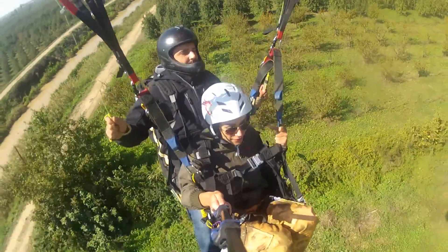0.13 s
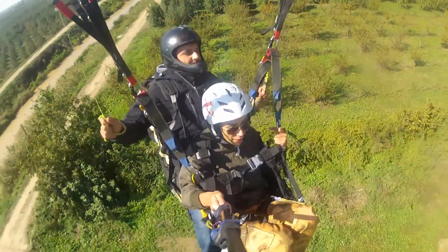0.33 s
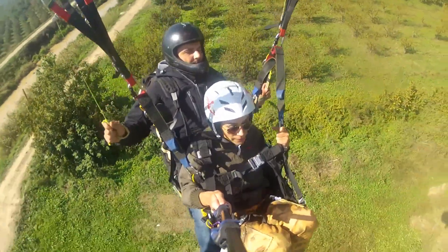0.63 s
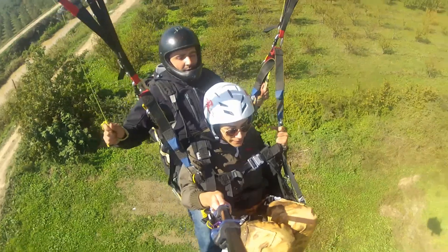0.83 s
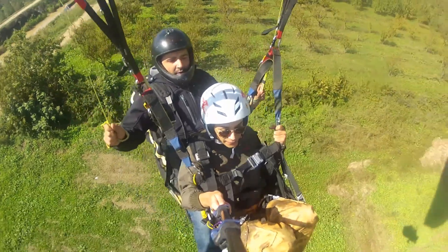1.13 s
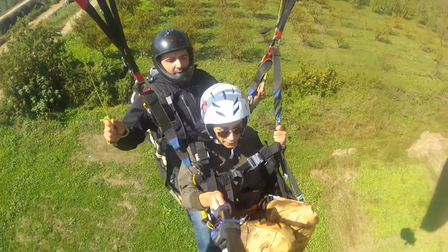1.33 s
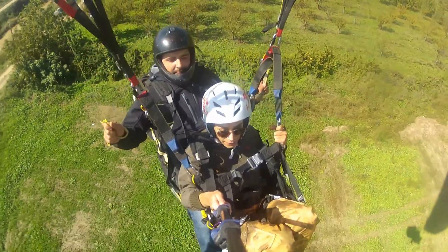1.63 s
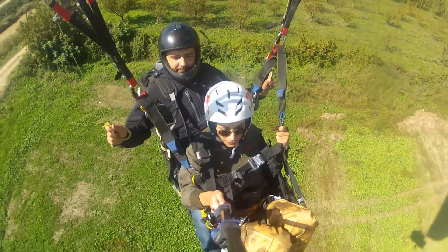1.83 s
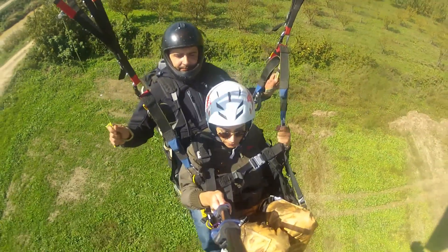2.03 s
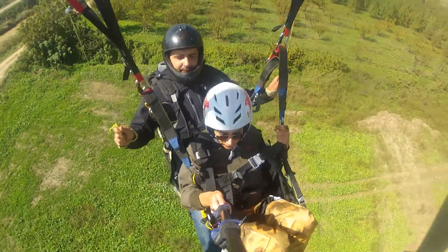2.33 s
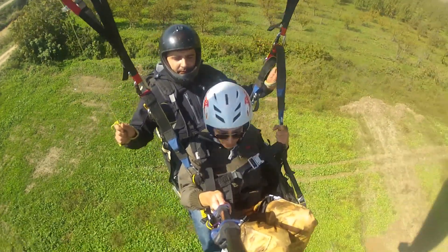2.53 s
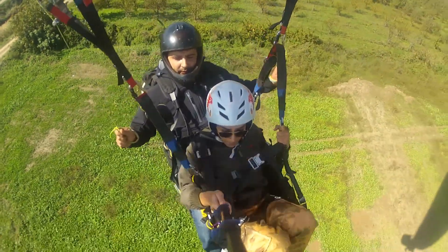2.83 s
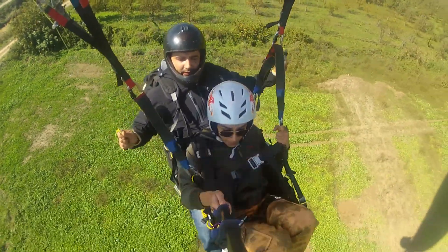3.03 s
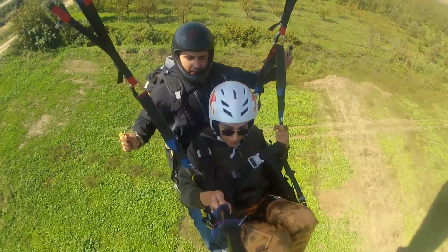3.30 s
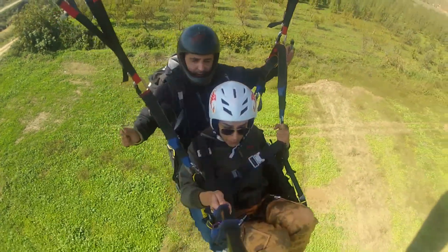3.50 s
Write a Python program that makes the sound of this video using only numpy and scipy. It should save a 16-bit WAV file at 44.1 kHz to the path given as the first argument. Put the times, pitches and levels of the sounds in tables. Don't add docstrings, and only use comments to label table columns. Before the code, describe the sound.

Low buffeting wind roar on a sealed camera case, with early hard thumps, gradually weakening

```python
import sys
import numpy as np
from scipy import signal
from scipy.fft import rfft, irfft, next_fast_len
from scipy.io import wavfile
from scipy.ndimage import uniform_filter1d, map_coordinates

SR = 44100
rng = np.random.default_rng(int(sys.argv[2]) if len(sys.argv) > 2 else 0)


def unload_audio(sound):
    columns = np.transpose(np.atleast_2d(sound))
    steps = np.round(np.clip(columns, -1, 1) * 32767)
    wavfile.write(sys.argv[1], SR, steps.astype(np.int16))


def gain_from_decibels(decibels):
    exponent = np.asarray(decibels, float) / 20
    return 10 ** exponent


N = 161406

# (time [s], strength [dB], heave of the large eddies [dB])
AIRFLOW = [(0.029, -31, 0), (.3, -29, -.5), (0.44, -29.5, -1), (0.77, -31.5, 0), (1.14, -33, 1.5),
           (1.35, -30.5, -1), (1.57, -30, -2), (1.721, -29.5, -1.5), (1.85, -34.5, 0), (2.13, -38, 1),
           (2.419, -40, -0.5), (2.69, -37, 0), (2.85, -38.5, 0.5), (3.06, -37, 0.5), (3.47, -41, -0.5),
           (3.63, -43.5, 0)]
# (frequency [Hz], density [dB per Hz])
DRUM_COLOUR = [(20, -24), (45, -6.5), (90, -4), (150, -0.5), (300, -3), (500, -6.5), (690, -12.5),
               (1000, -39)]
# (frequency [Hz], density [dB per Hz])
HISS_COLOUR = [(500, -23.5), (800, 2), (1100, -2.5), (1600, -9.5), (2100, -13.5), (2600, -21.5),
               (3100, -22), (6000, -63)]
# (frequency [Hz], width [Hz], level [dB])
CAVITIES = [(3588, 630, 5), (4443, 490, 3), (10380, 2400, -1.5)]
# (time [s], inward depth [full scale], width
# [ms])
SLAMS = [
    (0.0, -.3, .6),
    (0.1155, 1.08, .6),
    (0.3715, 1.06, .6),
    (0.6415, 1.34, .57),
    (0.8747, 1.23, .57),
    (3.66, .35, .6),
]

DRUM_DB, HISS_DB, CAVITY_DB = 22, -5, -20.5
DRUM_GROWS, HISS_GROWS, CAVITY_GROWS = 0.48, 0.78, 0.7
EDGE_HZ, EDGE_GROWS = 520, 0.3
SLAM_HUSH_MS = 1.9
NOTCH_HZ, NOTCH_WIDE_HZ, NOTCH_DEPTH = 3990, 129, 0.46
SKIP_S, SKIP_STEP, SKIP_MS = 1.91334, -0.3, 0.8
FULL, HARD = 1.0, 30
TOP_HZ = 10560
STEP_DB, STEP_FOLLOWS, STEP_SCATTER_DB = -29, 0.77, 1.7
HOP, GRID, LEAD = 1024, 43, 16


def unit(x):
    return x / np.sqrt(np.mean(x ** 2) + 1e-20)


def wobble(rate):
    knots = rng.standard_normal(int(N * 40 / SR) + 4)
    return map_coordinates(knots, [np.arange(N) * min(rate, 40) / SR])


def filtered(x, response):
    m = next_fast_len(N + 8192)
    return irfft(rfft(x, m) * response(np.fft.rfftfreq(m, 1 / SR)), m)[:N]


def coloured(points):
    f, db = np.transpose(points)
    return lambda hz: gain_from_decibels(np.interp(np.log(hz + 1), np.log(f + 1), db, left=db[0] - 10, right=-120))


def rush(response, patchy_db):
    z = signal.stft(rng.standard_normal(N), nperseg=512)[2]
    field = uniform_filter1d(rng.standard_normal(z.shape), size=5, axis=0)
    field = uniform_filter1d(field, size=10, axis=1)
    noise = signal.istft(z * gain_from_decibels(patchy_db * unit(field)), nperseg=512)[1][:N]
    return unit(filtered(noise, response))


def round_off(x, top, hard):
    return x / (1 + np.abs(x / top) ** hard) ** (1 / hard)


def drumming(gust_db, heave_db, eddy, flutter):
    level_db = DRUM_DB + DRUM_GROWS * gust_db + 0.66 * eddy + heave_db + 0.82 * flutter
    drum = gain_from_decibels(level_db) * rush(coloured(DRUM_COLOUR), patchy_db=0.53)
    edge = filtered(drum, lambda hz: 1 / (1 + (EDGE_HZ / (hz + 1)) ** 6))
    return drum + edge * (gain_from_decibels(EDGE_GROWS * gust_db - 0.73 * heave_db) - 1)


def slammed(drum):
    t_ms = np.arange(N) / SR * 1000
    keep, push = 1, 0
    for s, depth, width_ms in SLAMS:
        since_ms = t_ms - s * 1000
        u = since_ms / width_ms
        push = push - depth * (1 - 0.5 * u ** 2) * np.exp(-u ** 2 / 2)
        keep = keep * (1 - np.exp(-(since_ms / SLAM_HUSH_MS) ** 4))
    return drum * keep + push


def hiss(gust_db, eddy, flutter):
    level_db = HISS_DB + HISS_GROWS * gust_db + 0.54 * eddy + 0.97 * flutter
    return gain_from_decibels(level_db) * rush(coloured(HISS_COLOUR), patchy_db=0.26)


def cavity_ring(gust_db, eddy, flutter):
    def hollow(f):
        return sum(gain_from_decibels(db) * (f * w / np.abs(c * c - f * f + 1j * f * w)) ** 2 for c, w, db in CAVITIES)

    level_db = CAVITY_DB + CAVITY_GROWS * gust_db + 0.85 * wobble(5.4) + 0.36 * eddy + 0.43 * flutter
    return gain_from_decibels(level_db) * rush(hollow, patchy_db=1.43)


def side_pocket(leak):
    return filtered(leak, lambda hz: 1 - NOTCH_DEPTH * np.exp(-((hz - NOTCH_HZ) / NOTCH_WIDE_HZ) ** 2))


def scene():
    s, strength_db, heave = np.transpose(AIRFLOW)
    t = np.arange(N) / SR
    mean_db = strength_db.mean()
    gust_db = np.interp(t, s, strength_db) - mean_db
    heave_db = np.interp(t, s, heave)
    eddy, flutter = wobble(12), wobble(30)
    drum = round_off(gain_from_decibels(mean_db) * drumming(gust_db, heave_db, eddy, flutter), 0.92, 12)
    leak = gain_from_decibels(mean_db) * (hiss(gust_db, eddy, flutter) + cavity_ring(gust_db, eddy, flutter))
    return (slammed(drum) + side_pocket(leak))[None]


def skip():
    t = np.arange(N) / SR - SKIP_S
    return SKIP_STEP * np.sign(t) / 2 * np.exp(-np.abs(t) * 1000 / SKIP_MS)


def thinned(x):
    v = signal.resample_poly(np.pad(x, 441 * LEAD, "reflect"), 320, 441)[GRID:]
    frames = np.lib.stride_tricks.sliding_window_view(v, 2 * HOP)[::HOP]
    n = np.arange(2 * HOP) + 0.5
    k = np.arange(int(TOP_HZ / 16000 * HOP)) + 0.5
    window = np.sin(np.pi * n / HOP / 2)
    basis = np.sqrt(2 / HOP) * window * np.cos(np.pi / HOP * np.outer(k, n + HOP / 2))
    z = frames @ basis.T
    loud_db = 10 * np.log10(np.sum(z ** 2, axis=1) / HOP)
    step_db = STEP_DB + STEP_FOLLOWS * loud_db + STEP_SCATTER_DB * rng.standard_normal(len(z))
    step = gain_from_decibels(step_db)[:, None]
    z = np.sign(z) * step * np.floor((np.abs(z) / step) ** 0.75 + 0.4054) ** (4 / 3)
    halves = (z @ basis).reshape(len(z), 2, HOP)
    overlapped = (halves[1:, 0] + halves[:-1, 1]).ravel()
    v = np.r_[np.zeros(GRID + HOP), overlapped]
    return signal.resample_poly(v, 441, 320, window=("kaiser", 14))[441 * LEAD:][:N]


def roll_off(x):
    return signal.sosfilt(signal.butter(12, 12590, fs=SR, output="sos"), x)


def record(dry):
    overloaded = round_off(dry[0], FULL, HARD)
    stored = thinned(overloaded + skip())
    return roll_off(np.clip(stored, -FULL, FULL)[None])


dry = scene()
out = record(dry)
unload_audio(out)
```